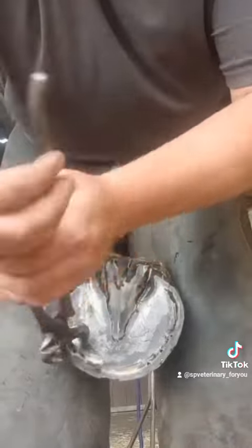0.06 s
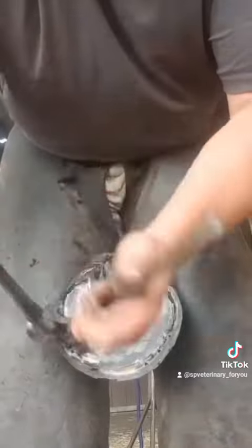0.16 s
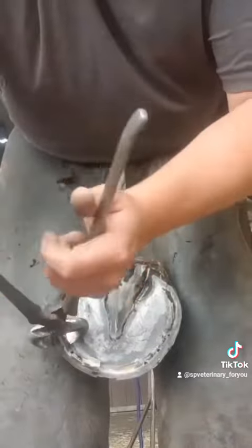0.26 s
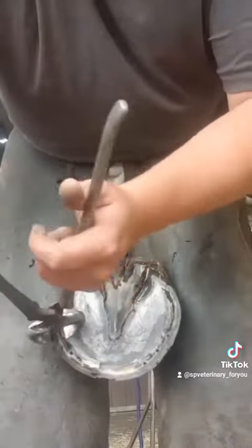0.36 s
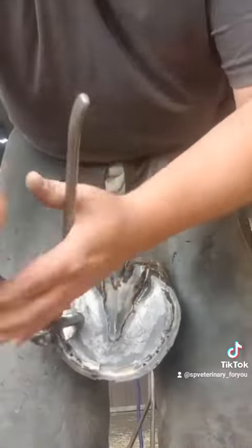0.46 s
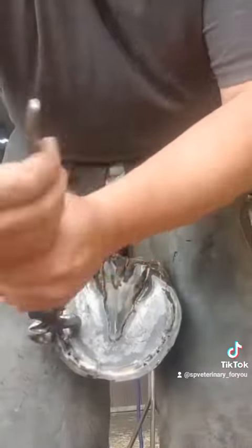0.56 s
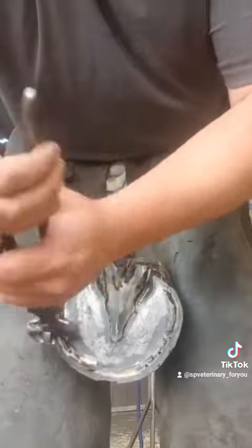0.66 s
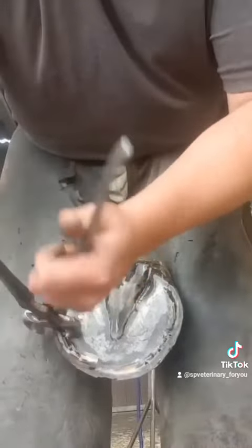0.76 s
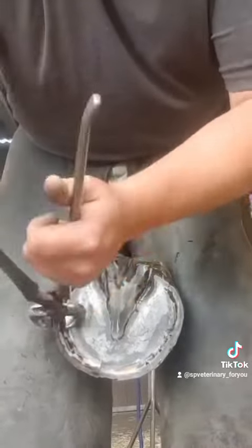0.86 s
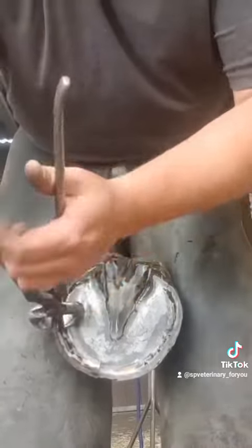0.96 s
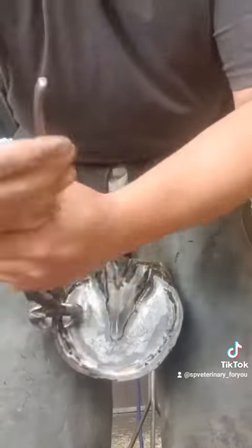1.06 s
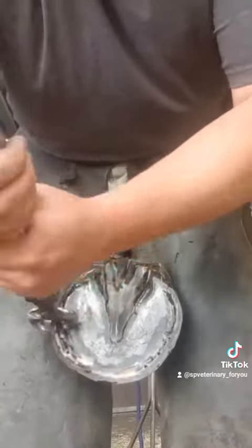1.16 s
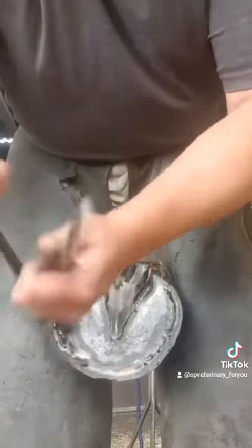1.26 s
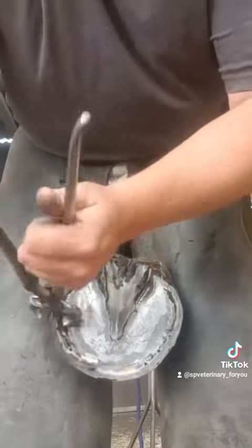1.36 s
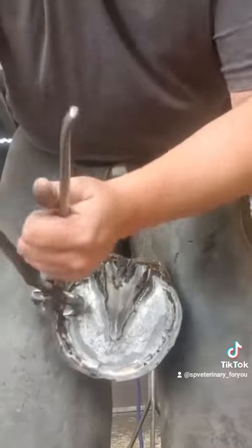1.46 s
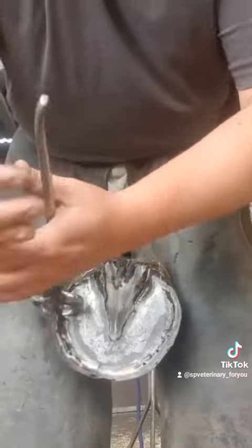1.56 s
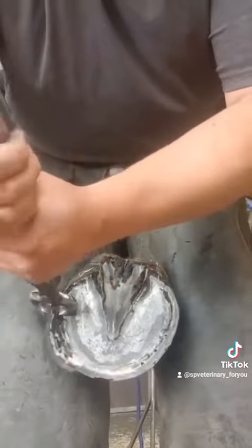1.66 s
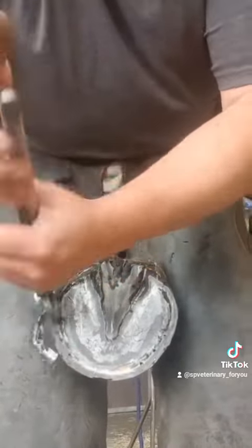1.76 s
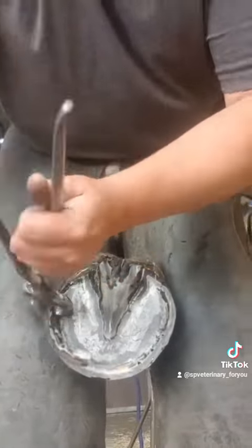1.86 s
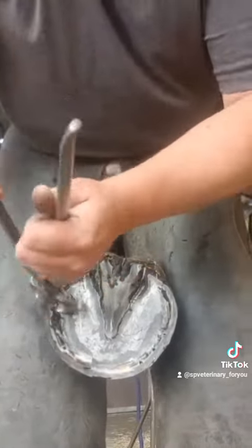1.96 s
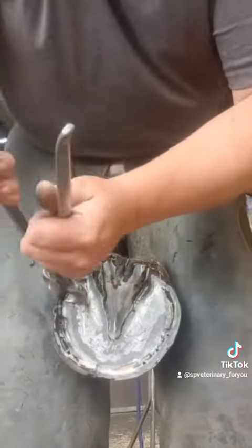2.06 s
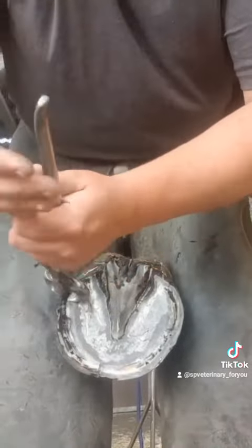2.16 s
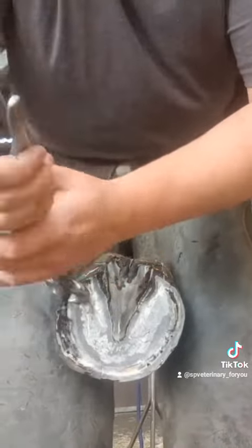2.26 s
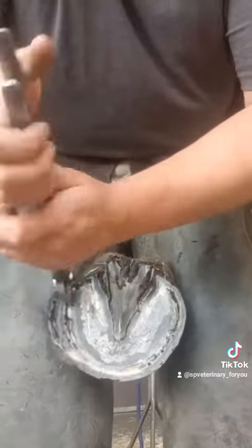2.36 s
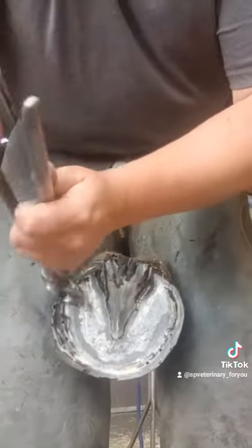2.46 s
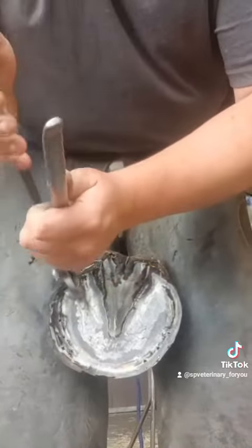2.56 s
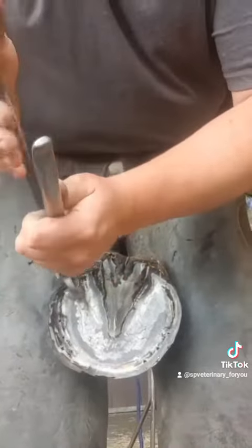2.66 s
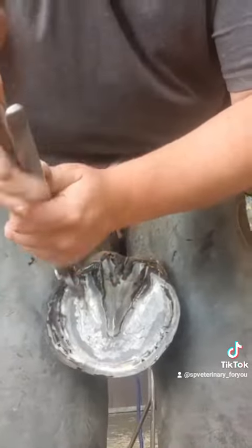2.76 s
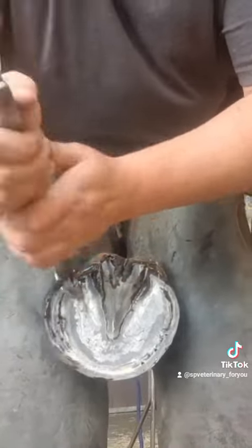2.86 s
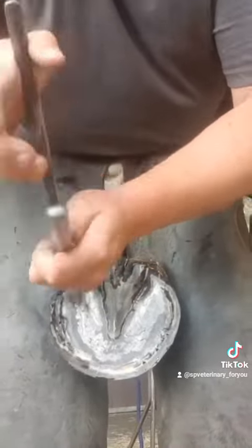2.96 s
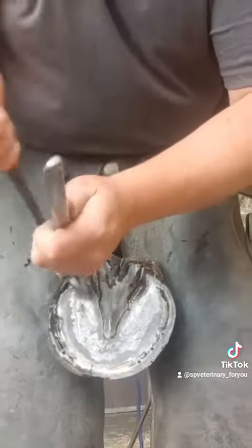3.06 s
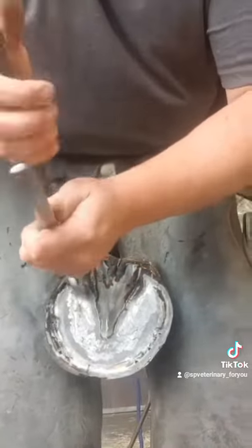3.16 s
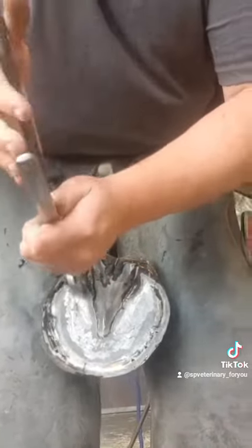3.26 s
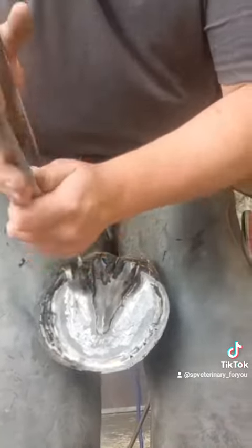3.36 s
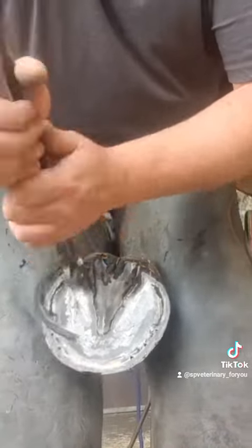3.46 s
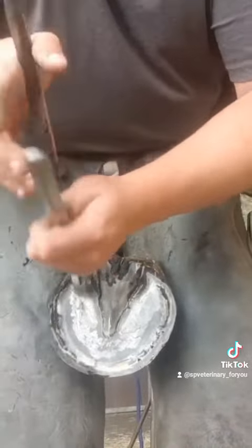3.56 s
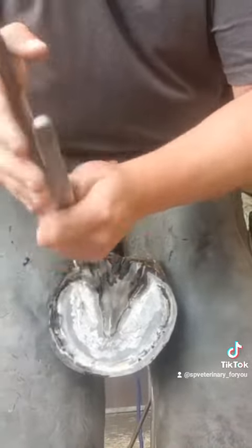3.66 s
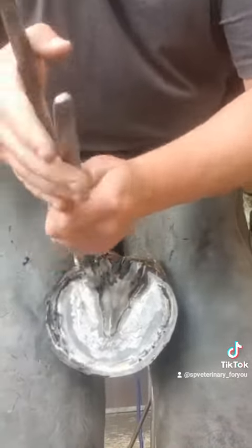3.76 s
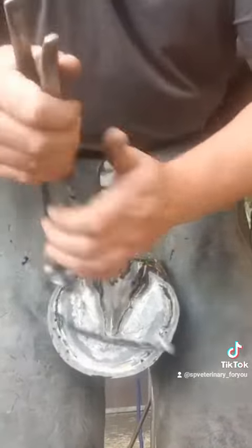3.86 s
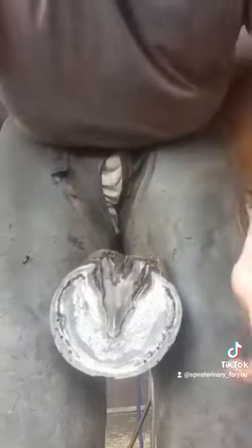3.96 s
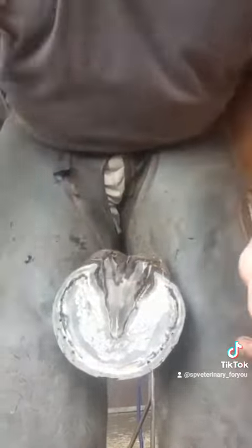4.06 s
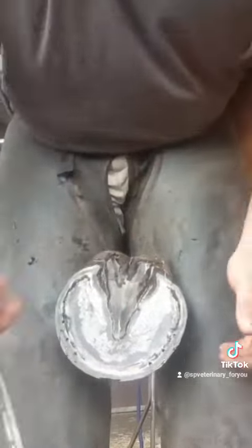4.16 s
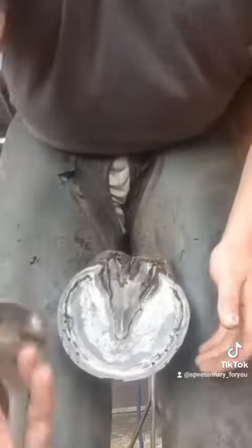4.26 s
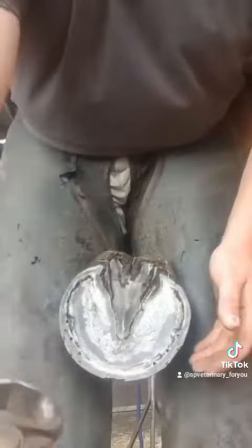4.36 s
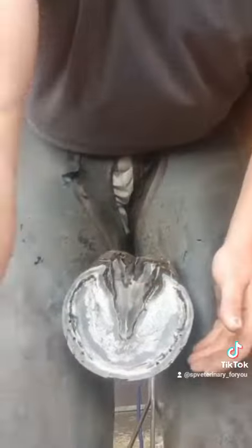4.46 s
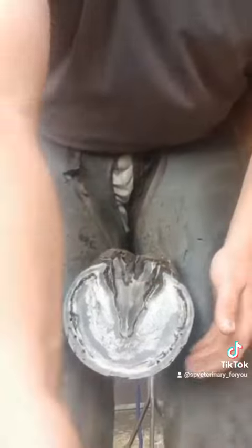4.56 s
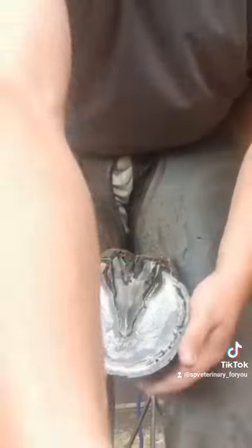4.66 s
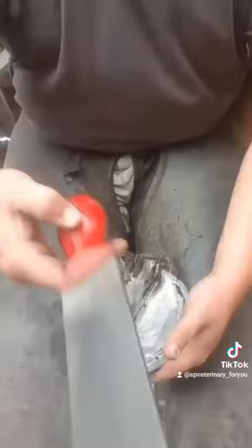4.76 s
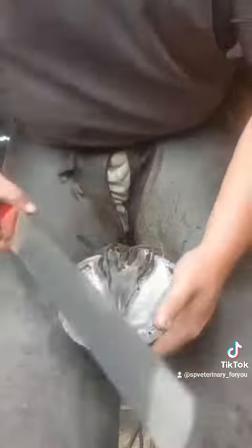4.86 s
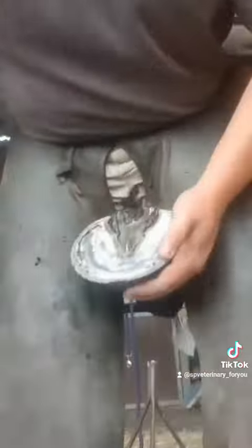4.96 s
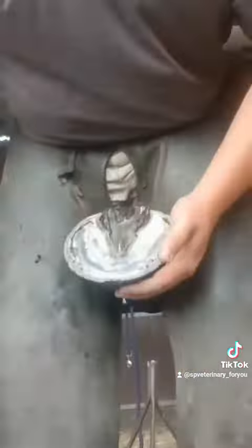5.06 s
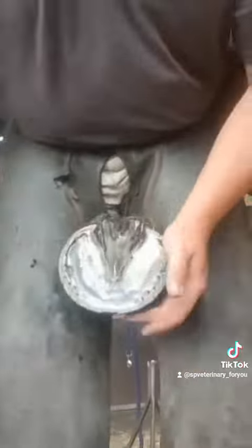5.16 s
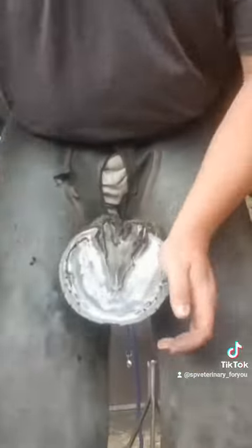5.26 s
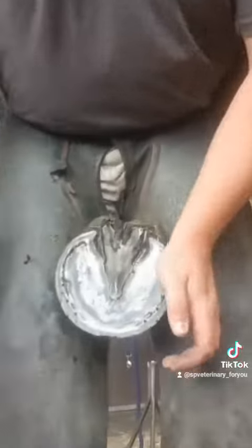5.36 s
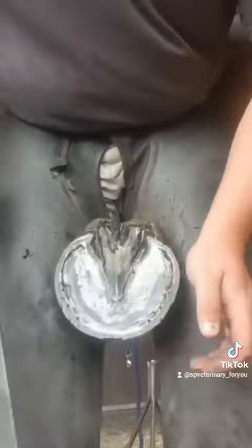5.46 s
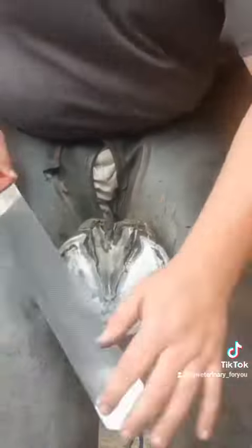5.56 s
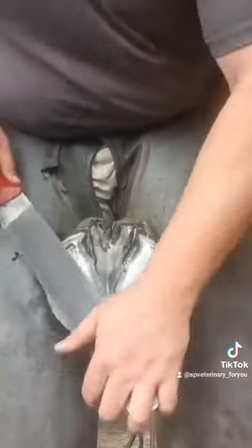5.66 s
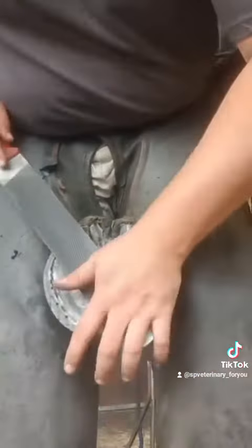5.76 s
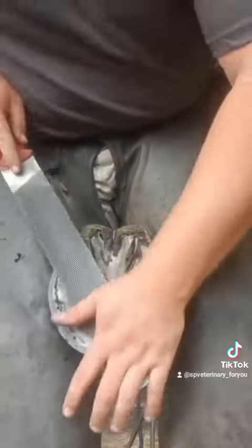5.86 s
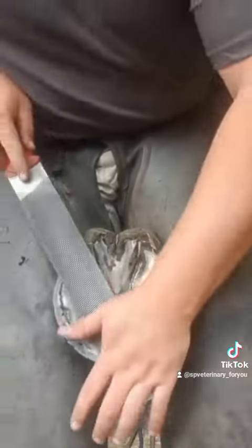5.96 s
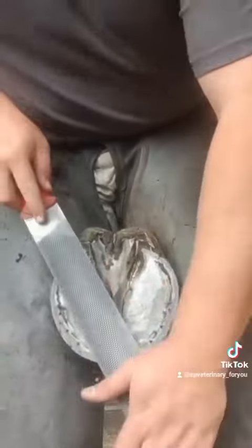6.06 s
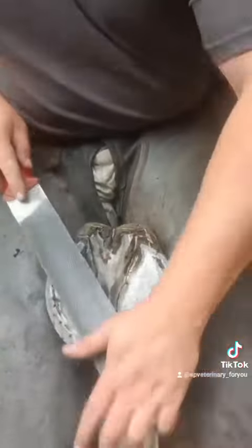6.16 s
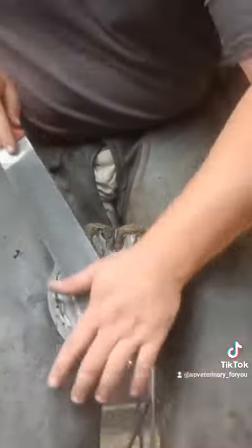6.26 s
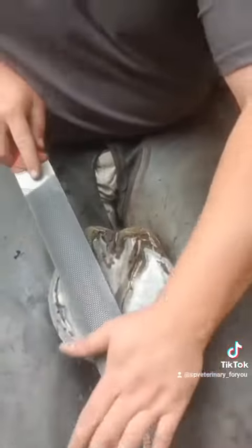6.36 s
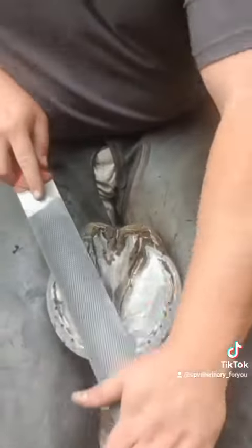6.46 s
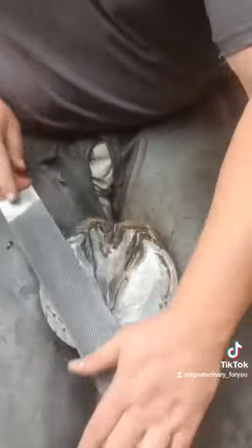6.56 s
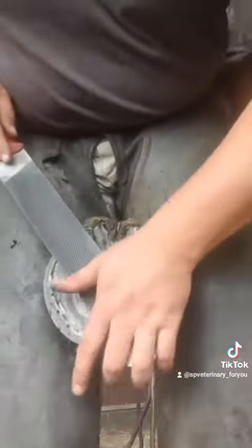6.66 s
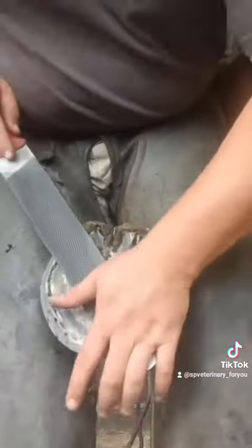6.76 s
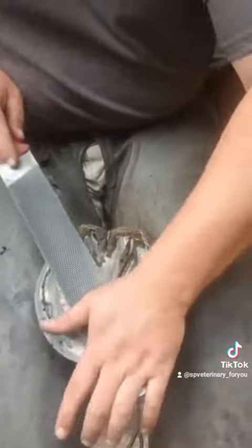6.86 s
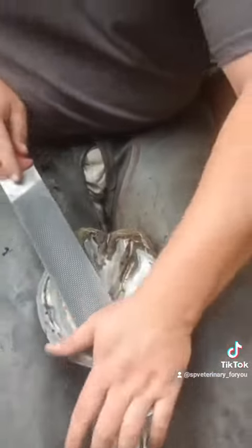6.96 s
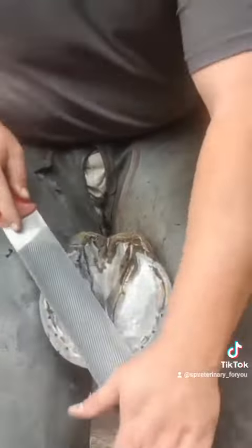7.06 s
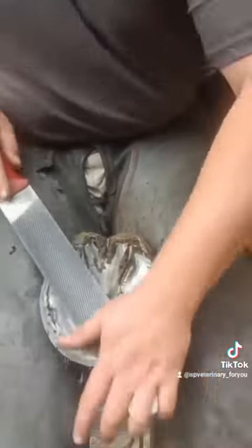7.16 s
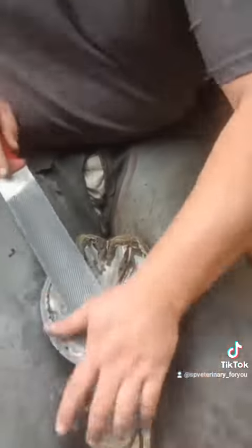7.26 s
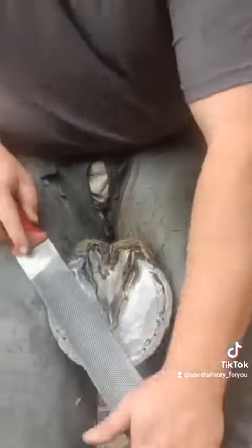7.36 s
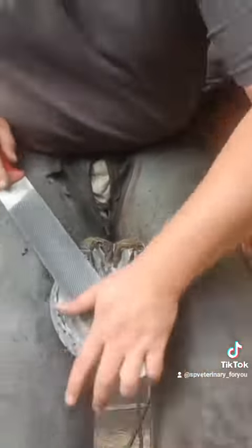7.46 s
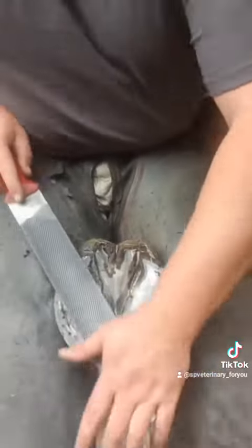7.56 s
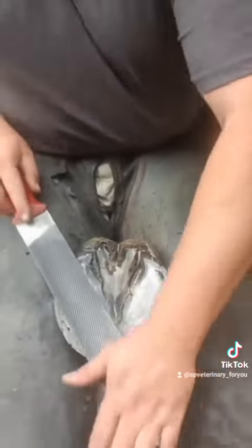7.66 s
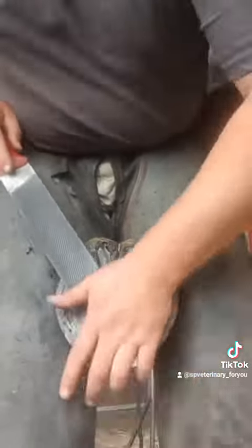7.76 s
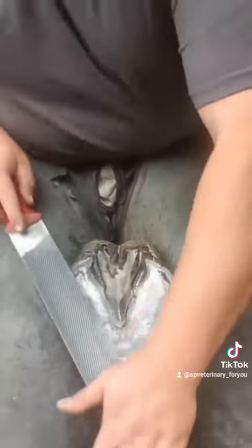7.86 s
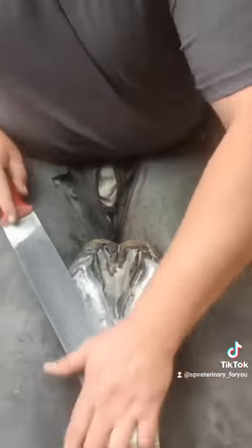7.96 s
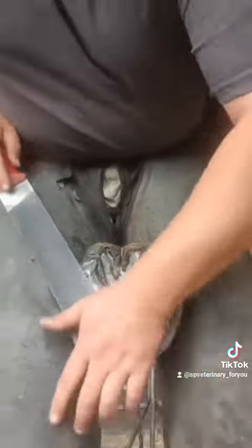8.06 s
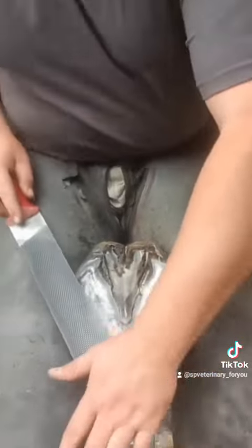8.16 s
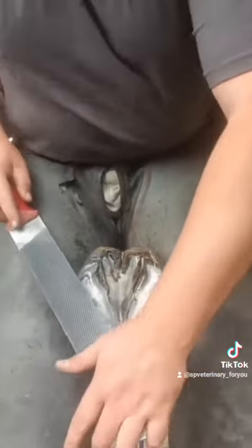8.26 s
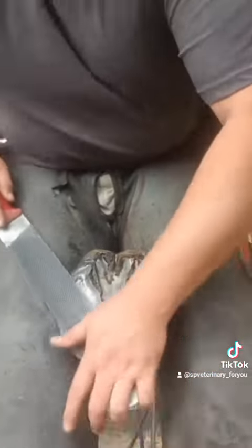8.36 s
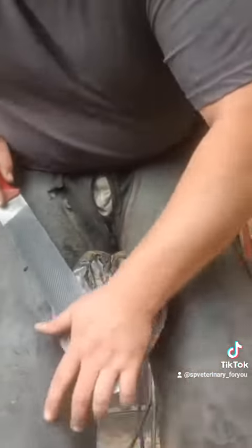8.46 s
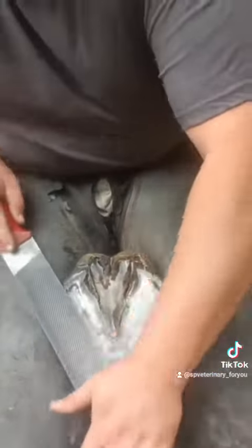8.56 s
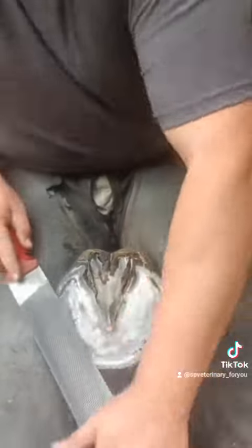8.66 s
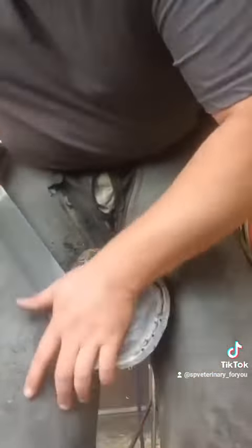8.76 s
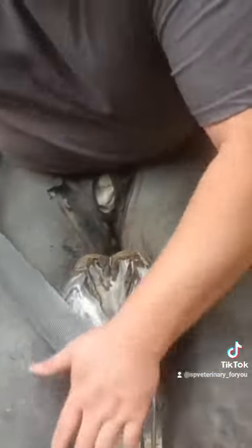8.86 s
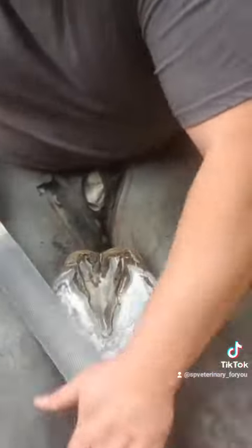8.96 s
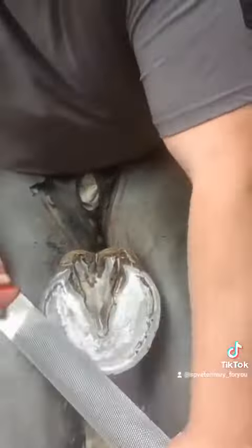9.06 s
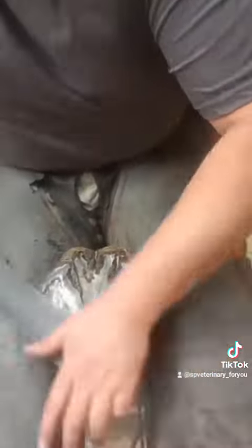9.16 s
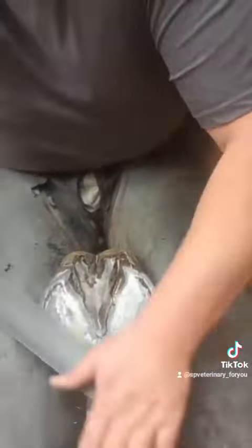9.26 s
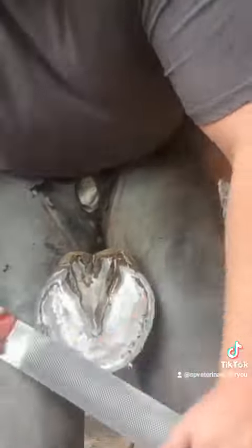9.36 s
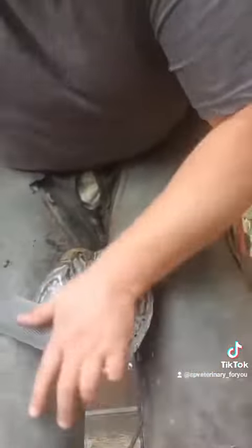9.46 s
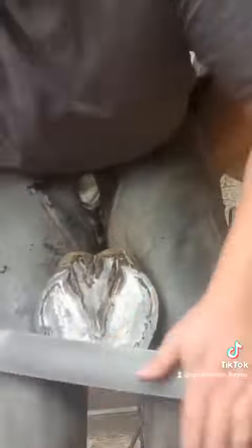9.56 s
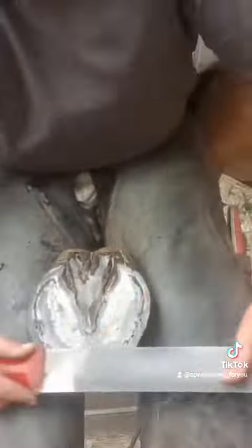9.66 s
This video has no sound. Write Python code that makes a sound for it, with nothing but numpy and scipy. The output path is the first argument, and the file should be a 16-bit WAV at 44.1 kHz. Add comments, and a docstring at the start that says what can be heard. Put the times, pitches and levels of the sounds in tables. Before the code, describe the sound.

Sharp, slightly ringing snips of hoof nippers give way to knocks and brief brushing, then a rasp scrapes rapidly back and forth.

```python
"""A farrier's nippers, brush and rasp work a hoof in a yard, close to a microphone with two spaced ports.
The horn cracks between the jaws, which rattle shut and ring the steel handles; hands and tools bump and tick.
A brush sweeps the sole from the right, then quick rasp strokes tear the horn: the blade sings, the hoof groans.
Sleeves and apron rustle, and the yard walls send back a short echo.
A low rumble swells with thumps of the cuts and handling carried to the microphone."""
import sys
import numpy as np
from scipy import signal
from scipy.fft import rfft, irfft
from scipy.io import wavfile
from scipy.ndimage import uniform_filter1d, map_coordinates

SR = 44100
rng = np.random.default_rng(int(sys.argv[2]) if len(sys.argv) > 2 else 0)


def put_to_file(sound):
    """Save the sound as 16-bit audio at rate SR, in the file named by the first command-line argument."""
    columns = np.atleast_2d(sound).T  # one column per channel
    safe = np.clip(columns, -1, 1)
    whole_steps = np.round(safe * 32767)
    wavfile.write(sys.argv[1], SR, whole_steps.astype(np.int16))


N = 427769

# Arm movements: start_s, length_s, rustle_db, hum_above_db, hiss_above_db
CLOTH_MOVES = [(0.086, 0.23, -67.5, -0.5, 0), (0.307, 0.14, -63.5, -2, -21), (0.65, 0.23, -61.5, 4, -7.5),
               (0.98, 0.041, -66.5, 2.5, -4), (1.14, 0.046, -76, 5.5, -19), (1.406, 0.14, -64, -18, -5),
               (1.867, 0.2, -64, -8, -3.5), (2.026, 0.048, -70, 0, 5), (2.386, 0.25, -67.5, -7, -3),
               (2.641, 0.12, -75.5, -0.5, -7), (2.869, 0.45, -78, 11.5, -7), (3.323, 0.16, -68, 3, -7),
               (3.744, 0.096, -67, 2.5, 8.5), (3.955, 0.09, -91, 20, 3.5), (4.114, 0.21, -65, 1, 6.5),
               (4.356, 0.38, -72.5, 6, 6), (5.06, 0.031, -87, 13.5, -14), (5.176, 0.051, -61.5, -7, 1.5),
               (5.411, 0.029, -82.5, -0.5, 12), (5.545, 0.18, -68, -7.5, -3.5), (5.906, 0.088, -87, 20, 5),
               (6.035, 0.11, -77.5, 9, -3)]
# The cloth's middle, low and high layers: freq_hz, level_db
RUSTLE_SPECTRUM = [(850, -24), (1100, -1.5), (1900, -3), (2900, -6), (3450, -22)]
HUM_SPECTRUM = [(76, -42), (130, -16), (291, -11.5), (332, -0.5), (370, -6), (458, -4), (501, -5),
                (1100, -23), (1430, -53.5), (2420, -120)]
HISS_SPECTRUM = [(2600, -19), (3100, -7.5), (5000, -2.5), (6200, -15), (8500, -19.5), (12000, -28.5),
                 (15000, -38.5)]
# Narrow bands in rustle and hiss: centre_hz, width_hz, gain_db
CLOTH_PEAKS = [(1450, 360, 7.5), (2220, 480, 13), (4000, 250, 5.5), (4590, 450, 8)]
# Low rumble, swelling with thumps of the cuts and handling carried to the microphone: time_s, level_db
RUMBLE_LEVEL = [(0.0, -65), (0.24, -56), (0.51, -73.5), (0.86, -55), (0.94, -76), (1.2, -60.5),
                (1.7, -71.5), (1.95, -56), (2.08, -69), (2.16, -54.5), (2.3, -54.5), (2.75, -60.5),
                (3.2, -54), (3.6, -59), (3.95, -66.5), (4.25, -58), (4.54, -61), (4.83, -46), (5.08, -71),
                (6.05, -64.5), (6.24, -49), (6.83, -54.5), (6.89, -36), (7.0, -64.5), (7.24, -53.5),
                (8.21, -57.5), (9.05, -46), (9.13, -36.5), (9.25, -43.5), (9.55, -50), (9.62, -48),
                (9.7, -44)]
# Colour of the rumble: freq_hz, level_db
RUMBLE_SPECTRUM = [(12, -40), (20, -21), (54, 8.5), (123, -1), (170, -4), (220, -23.5), (370, -120)]
# Nipper cuts: start_s, level_db, rise_s, hold_s, t60_s, shut_after_s, rattle_above_db, steel_ring_db,
# then band gains against the ring band: jolt_db, thud_db, knock_db, crack_db, clang_db, treble_db
NIPPER_CUTS = [(0.23, -4.5, 0.00058, 0.0036, 0.024, 0.014, -4, -54.5, -18, -14.5, -14, -6, -5.5, -21),
               (0.8463, -7, 0.00066, 0.0021, 0.028, 0.013, -6.5, -53, -14.5, -18, -14, 1.5, -1, -14),
               (1.3756, -9, 0.00065, 0.0024, 0.011, 0.019, -26.5, -53.5, -20, -12.5, -8, 5.5, -1, -19.5),
               (1.934, -10, 0.00082, 0.0014, 0.034, 0.012, -3, -57, -12, -16, -10, 1, -1, -10),
               (2.5463, -23.5, 0.0009, 0.01, 0.012, 0.0094, 10, -75, -17, -18, -3, 6, 3, -6),
               (3.098, -28, 0.0044, 0.0058, 0.028, 0.017, -13, -67, -5, -14.5, 0, 5.5, 7, -10.5),
               (3.707, -15.5, 0.006, 0.0016, 0.022, 0.0084, -24, -81, -20, -30.5, -7.5, 2.5, 5, -15.5)]
# Lingering rings of the steel handles: pitch_hz, level_db, t60_s
HANDLE_MODES = [(2200, -7, .17), (2270, -4, .26), (2338, -2, .33), (2365, -4, .28), (2420, -6, .2),
                (3540, -11, .16), (3725, -9, .24), (4290, -10, .2), (4530, -13, .24), (5050, -12, .16),
                (5290, -14, .12), (5580, -15, .16)]
# Colour common to all snaps: freq_hz, level_db
SNAP_SPECTRUM = [(60, -7), (150, -3), (280, 3), (420, 17), (800, 7.5), (1000, -3), (1800, -5), (2900, -8.5),
                 (5600, -0.5), (6500, -11), (8300, -11.5), (9200, -17.5), (11000, -7.5), (14000, -24.5),
                 (15000, -28)]
# Treble lift on the second burst of each snap, a bright hiss after the crack: freq_hz, gain_db
SECOND_BURST_LIFT = [(1000, -8), (3700, -7.5), (5200, -2), (7800, 8), (12000, 3)]
# Short rings of the jaws: centre_hz, width_hz, gain_db
JAW_PEAKS = [(1305, 260, 21), (2278, 300, 18.5), (3684, 440, 14.5), (4300, 180, 6.5), (4810, 310, 10),
             (5286, 330, 8), (7800, 430, 9.5)]
# Bumps of hands, tools and hoof: start_s, peak_db, pitch_hz, t60_s, length_s, scuff_db
BUMPS = [(0.435, -55, 652, 0.03, 0.045, -62), (1.093, -49, 340, 0.1, 0.015, -72.5),
         (1.168, -56.5, 373, 0.044, 0.023, -75), (2.153, -29.5, 102.5, 0.0078, 0.026, -56),
         (2.291, -19.5, 289, 0.017, 0.013, -37), (2.292, -20, 707, .015, 0.0062, -60),
         (2.431, -47, 124, 0.067, 0.017, -81), (2.733, -52, 103, 0.045, 0.01, -59),
         (3.221, -49, 102, 0.065, 0.0049, -50), (3.269, -32.5, 760, 0.018, 0.04, -53),
         (3.29, -33.5, 386, 0.018, 0.042, -76), (3.49, -24, 300, 0.014, 0.018, -65),
         (3.497, -29.5, 740, .015, 0.02, -38.5), (3.609, -31.5, 280, 0.014, 0.018, -52.5),
         (4.069, -43, 466, 0.076, 0.01, -47.5), (4.243, -41, 456, 0.053, 0.012, -39.5),
         (4.33, -34.5, 367, 0.02, 0.021, -62), (4.573, -23, 830, 0.024, 0.017, -49),
         (4.6588, -12, 764, 0.042, 0.003, -23.5), (4.663, -33, 326, 0.025, .005, -57.5),
         (4.688, -20, 790, .025, .01, -45), (4.96, -27.5, 205, 0.035, 0.02, -60),
         (4.719, -27, 770, 0.047, 0.008, -52), (4.801, -4, 774, 0.025, 0.012, -23.5),
         (4.823, -14, 864, 0.026, 0.0033, -16), (5.034, -28, 786, 0.013, 0.014, -59),
         (5.88, -49, 604, 0.04, 0.0087, -59), (5.996, -40.5, 203, 0.045, 0.015, -58.5),
         (6.068, -58, 104.4, 0.049, 0.016, -53), (6.126, -39, 535, 0.014, 0.019, -50),
         (6.204, -29.5, 456, 0.017, 0.0064, -43), (6.559, -21.5, 450, 0.0091, 0.0052, -43),
         (6.672, -29.5, 231, 0.017, 0.011, -52), (6.695, -28, 450, 0.011, .008, -47),
         (6.775, -30, 220, .02, 0.019, -60), (6.778, -26.5, 810, .015, 0.021, -56),
         (6.833, -30, 754, 0.019, .015, -58), (6.854, -15.5, 170, 0.058, 0.006, -54),
         (6.878, -11.5, 260, 0.037, 0.015, -54), (7.083, -36.5, 600, 0.033, 0.012, -40),
         (8.502, -25.5, 500, 0.0094, 0.0077, -43)]
# Surfaces scuffing: freq_hz, level_db
SCUFF_SPECTRUM = [(300, -33.5), (550, -2.5), (1800, -4.5), (2900, -12.5), (5000, 2), (6200, -13.5),
                  (8500, -21), (12000, -43), (15000, -49.5)]
# Faint high chirps: start_s, peak_db, pitch_hz, length_s
CHIRPS = [(0.452, -44.5, 4630, 0.036), (.728, -41, 2270, 0.022), (0.97, -56, 4340, 0.037),
          (1.158, -54.5, 1640, 0.032), (1.5, -58, 1570, 0.075), (1.543, -54.5, 4510, 0.063),
          (3.36, -53, 4450, 0.13), (3.801, -52, 4880, 0.015), (4.162, -50, 4400, 0.047),
          (4.362, -50.5, 4510, 0.055)]
# Dry pivot of the nippers: time_s, level_db
SQUEAK_LEVEL = [(1.45, -85), (1.46, -30), (1.482, -37), (1.52, -93)]
# Soft swells of treble: start_s, level_db, length_s
SWISHES = [(2.051, -73.5, .04), (4.248, -68, 0.031), (4.791, -53, 0.021), (9.591, -59.5, 0.044)]
# Tool ticking on tool or horn: start_s, peak_db
TICKS = [(3.492, -46.5), (4.2458, -27), (4.568, -42.5), (4.658, -15), (4.7205, -34.5), (4.825, -12),
         (4.9358, -23.5), (6.56, -29.5), (6.673, -36), (6.732, -26), (6.865, -20), (7.0938, -29.5),
         (8.502, -36), (9.1904, -34)]
# Strokes on the hoof: start_s, length_s, peak_place (0-1), slope_db_per_s (to and from the peak),
# level_db, hoof_above_db, teeth_above_db
BRUSH_STROKES = [(4.556, 0.041, 0.67, 567.5, -32, 1.5, -10), (4.61, 0.041, 0.4, 888, -39.5, 7, -2.5),
                 (4.678, 0.02, 0.54, 495.5, -40.5, 9, -2.5), (4.716, 0.1, 0.8, 31, -40, 3.5, 1),
                 (4.799, 0.024, 1, 85.5, -30, 5.5, 2), (4.84, 0.045, 0.66, 325.5, -52, 13.5, -16.5),
                 (4.922, 0.064, 0.54, 388.5, -29, -2, 4.5)]
RASP_STROKES = [(6.245, 0.086, 0.72, 149, -38.5, 0, 1), (6.342, 0.024, .5, 100, -43, -1.5, -1.5),
                (6.41, 0.081, 0.62, 403, -35.5, 4.5, 0), (6.548, 0.048, 0.96, 144, -40.5, 3, 1.5),
                (6.615, 0.018, 0.74, 510, -43, 1.5, 0), (6.668, 0.026, 0.97, 499, -41, 10, 1),
                (6.722, 0.062, 0.57, 230, -40.5, 2.5, 0), (6.83, 0.13, 0.35, 560, -30, 6, -4),
                (7.188, 0.17, 0.84, 61, -44, 1.5, 0.5), (7.395, 0.08, 0.47, 233, -41.5, 3.5, 1.5),
                (7.513, 0.12, 0.61, 117, -39, 1, 0.5), (7.675, 0.071, 0.61, 287, -42, 4.5, 2),
                (7.785, 0.11, 0.48, 161, -42, 2, 1.5), (7.935, 0.066, 0.52, 347, -42, 3, 1),
                (8.035, 0.15, 0.56, 132, -40.5, 1, 4.5), (8.215, 0.067, 0.56, 251, -42, 1.5, 3.5),
                (8.315, 0.12, 0.7, 142, -39, -3, 0.5), (8.47, 0.023, 0.7, 103, -52, -3, -1),
                (8.498, 0.052, 0.21, 723, -32, -1.5, -6.5), (8.625, 0.059, 0.42, 292, -53.5, 6, 2.5),
                (8.725, 0.17, 0.55, 120, -41.5, 0, 5), (8.935, 0.077, 0.62, 345, -36, 2, 4.5),
                (9.035, 0.13, 0, 93, -48, 1.5, 3), (9.19, 0.15, 0.46, 171.5, -37, 1, 4.5),
                (9.39, 0.084, 0.42, 295, -37, -1.5, 4.5), (9.49, 0.13, 0.38, 98, -37, -3, 2.5),
                (9.62, 0.028, 0.46, 513, -36.5, -0.5, 2.5), (9.665, 0.058, 0.6, 427, -35, -5, 6)]
# What a scrape sounds in (hoof under either tool, blade, teeth): freq_hz, level_db
BRUSHED_HOOF_SPECTRUM = [(65, -112), (110, -40.5), (151, 2), (189, -1.5), (367, -5), (509, -5), (693, 7),
                         (980, -9), (1100, 0), (1430, -57.5), (2420, -120)]
RASPED_HOOF_SPECTRUM = [(65, -24), (110, -2.5), (216, -1), (257, -1), (378, -1), (420, -0.5), (490, 0.5),
                        (734, -5), (1100, -14.5), (1430, -30), (2420, -120)]
BLADE_SPECTRUM = [(850, -16), (1050, 4), (1900, -1), (2900, -3), (3300, -22)]
TEETH_SPECTRUM = [(2700, -55), (3100, -13), (5000, 0), (6000, -11.5), (8300, -18.5), (9500, -32.5),
                  (12000, -34.5), (15000, -57)]
# Hollow rings of the hoof: centre_hz, width_hz, gain_db
HOOF_PEAKS = [(294, 52, 4.5), (418, 21, 3), (633, 70, 6)]
# Narrow rings of the rasp blade: pitch_hz, level_db, t60_s
BLADE_MODES = [(1193, -53, 0.037), (1505, -45.5, 0.069), (1738, -50, 0.065), (2106, -55, 0.088),
               (2357, -46, 0.077), (2503, -42, 0.052), (2930, -37, .03), (3384, -30, 0.025),
               (3696, -32.5, 0.022), (4380, -40, 0.034), (4716, -34.5, 0.024), (5067, -38, 0.041),
               (5520, -44, 0.041)]
# The blade rings less as the free hand bears down on it: time_s, gain_db
BLADE_RING_LEVEL = [(4, -5.5), (7.9, -6.5), (8.1, -4.5), (9.7, -7.5)]
# The blade singing and the hoof groaning: start_s, peak_db, pitch_hz, length_s
BLADE_SINGS = [(6.305, -24.5, 2344, 0.021), (6.35, -32, 2440, 0.029), (6.44, -33, 2500, 0.017),
               (6.67, -32, 2320, 0.018), (6.725, -30.5, 2290, 0.024), (6.75, -31.5, 3340, .015),
               (6.865, -18.5, 4340, 0.012), (7.56, -34, 2450, 0.066), (7.71, -36, 1530, 0.034),
               (7.835, -34.5, 2380, .04), (7.95, -38.5, 1430, 0.039), (8.03, -38, 1736, 0.044),
               (8.105, -33, 3850, .05), (8.235, -36, 1480, 0.046), (8.37, -34, 3950, 0.039)]
HOOF_GROANS = [(6.443, -25.5, 152, 0.031), (6.885, -23, 425, 0.029), (7.416, -35.5, 336, 0.048),
               (7.559, -26.5, 163, 0.04), (7.702, -34.5, 452.4, 0.041), (7.944, -38, 190, 0.028),
               (7.98, -33, 312, 0.034), (8.244, -29, 334, 0.021), (8.272, -31, 336, 0.0195),
               (8.394, -41, 240, 0.021), (8.827, -37, 585, 0.086), (8.965, -33.5, 180, 0.04),
               (9.229, -35, 583, 0.042), (9.409, -34.5, 630, 0.044), (9.535, -36, 526, 0.03),
               (9.59, -30.5, 241, .03)]
# What the yard walls send back: freq_hz, gain_db
WALL_SPECTRUM = [(200, -5), (600, -1), (1300, -4), (2300, 0.5), (3750, -3.5), (5000, -2.5), (10000, -0.5)]
# Resonances of the microphone housing: centre_hz, width_hz, gain_db
HOUSING_PEAKS = [(1506, 460, 8), (2352, 710, 12), (3753, 810, 5), (4500, 6200, 4)]
# Balance of the two ports: freq_hz, left_minus_right_db
PORT_BALANCE = [(60, -9), (110, -11.5), (200, -1.5), (380, 1.5), (700, -3.5), (1280, -2.5), (2370, -1.5),
                (4370, 0), (8070, 3.5), (14900, 8.5)]

SNAP_BANDS_HZ = 170, 550, 1310, 2320, 3700, 5000, 10000   # jolt, thud, knock, ring, crack, clang, treble
BITE_DB_PER_S, LIFT_DB_PER_S = 2501, 1303   # how fast a tool takes hold and lets go


def amp(db):
    """Decibels to gain."""
    return 10 ** (np.asarray(db, float) / 20)


def rms_one(x):
    """Scale to an rms of 1."""
    return x / np.sqrt(np.mean(x ** 2) + 1e-20)


def level_curve(rows):
    """Level in dB at every sample; silent outside the rows."""
    time_s, db = np.transpose(rows)
    return np.interp(np.arange(N) / SR, time_s, db, left=-150, right=-150)


def colour(x, spectrum, peaks=()):
    """Minimum-phase filter from a spectrum and resonant peaks."""
    hz, points = np.linspace(1, SR / 2, 4097), np.array(spectrum)
    db = np.interp(np.log(hz), np.log(np.maximum(points[:, 0], 1)), points[:, 1])
    db += sum(gain / (1 + (2 * (hz - centre) / width) ** 2) for centre, width, gain in peaks)
    cepstrum = irfft(db * np.log(10) / 20)
    cepstrum[1:4096] *= 2
    cepstrum[4097:] = 0
    response = irfft(np.exp(rfft(cepstrum)))[:4096]
    return signal.oaconvolve(x, response)[:N]


def band(x, spectrum, peaks=()):
    """Colour x, with -80 dB an octave beyond both ends of the spectrum; rms 1."""
    closed = [(spectrum[0][0] / 2, -80), *spectrum, (spectrum[-1][0] * 2, -80)]
    return rms_one(colour(x, closed, peaks)[:len(x)])


def drift(rate_hz):
    """Slow random wander of rms 1."""
    pole = np.exp(-80 * np.pi * rate_hz / SR)
    slow = signal.lfilter([1], [1, -2 * pole, pole * pole], rng.standard_normal(N // 40 + 2002))[2000:]
    return np.interp(np.arange(N) / 40, np.arange(len(slow)), rms_one(slow))


def ring(x, hz, t60):
    """Resonator: a unit click sets a sine of height 1 ringing."""
    pole, angle = amp(-60 / (t60 * SR)), 2 * np.pi * hz / SR
    return signal.lfilter([0, np.sin(angle)], [1, -2 * pole * np.cos(angle), pole * pole], x + 1e-18)


def grains(per_s, spread_db, count=N):
    """Random clicks of uneven size; rms 1."""
    sizes = amp(spread_db * np.minimum(rng.exponential(1, count), 5)) * rng.choice([-1, 1], count)
    return rms_one(sizes * (rng.random(count) < per_s / SR))


def pulse(start, rise, t60, hold=0):
    """Samples and gains of an envelope that swells to 1, holds and dies."""
    t = np.arange(-4 * rise, hold + t60, 1 / SR)
    at = np.round((start + rise + t) * SR).astype(int)
    shape = np.where(t < 0, np.exp(t / rise), amp(-60 * np.maximum(t - hold, 0) / t60))
    return at[at < N], shape[at < N]


def stroke(start, length, place, slope, bite, lift):
    """Samples and gains of a movement that takes hold, swells to 1, sags and lets go; rates in dB/s."""
    at = np.arange(max(int((start - .3) * SR), 0), min(int((start + length + .3) * SR), N))
    t = at / SR - start
    edges_db = bite * np.maximum(-t, 0) + lift * np.maximum(t - length, 0)
    return at, amp(-slope * np.abs(t - place * length) - edges_db)


def two_paths(x, radians):
    """Sound wraps round the body to each port by its own path: band by band one port leads or lags."""
    hz = np.arange(0, SR / 2 + 700, 700)
    chance = np.interp(np.fft.rfftfreq(len(x), 1 / SR), hz, rng.standard_normal(len(hz)))
    lead = radians * np.tanh(3.9 * chance)
    return irfft(rfft(x) * np.exp(1j * lead * [[1], [-1]]), len(x))


def moving(pair, wander_s, rate_hz):
    """The far port hears a moving source a little earlier or later."""
    read_at = np.arange(N) + wander_s * SR * drift(rate_hz)
    return np.array([pair[0], map_coordinates(pair[1], [read_at], order=3, mode="nearest")])


def cloth(fade_db_per_s=251.5):
    """Sleeves and apron rub as the arms move: patchy rustle, hum and hiss."""
    levels = amp([[-79], [-70], [-70.5]]) * np.ones(N)   # the three layers when nothing moves
    for start, length, db, hum_db, hiss_db in CLOTH_MOVES:
        at, shape = stroke(start, length, .5, 0, fade_db_per_s, fade_db_per_s)
        levels[:, at] += amp([[db], [db + hum_db], [db + hiss_db]]) * shape
    rustle, hum, hiss = levels * amp([2.6 * drift(5.5) + 1.6 * drift(25) for layer in range(3)])
    out, shared = np.zeros((2, N)), grains(5000, 1.9)
    for port, shift in zip(out, (9, -9)):
        rubbing = np.roll(shared, shift) + 6.9 * rng.standard_normal(N)
        port += rustle * band(rubbing, RUSTLE_SPECTRUM, CLOTH_PEAKS)
        port += hiss * band(rubbing, HISS_SPECTRUM, CLOTH_PEAKS)
        port += hum * band(rubbing, HUM_SPECTRUM)
    return out


def rumble():
    """Low rumble, each port's own, swelling with thumps of cuts and handling carried to the microphone."""
    swell = amp([level_curve(RUMBLE_LEVEL) + 1.5 * drift(6.8) for port in range(2)])
    return swell * [band(rng.standard_normal(N), RUMBLE_SPECTRUM) for port in range(2)]


def burst(noise, start, db, rise, t60, hold=0):
    """A pulse of noise with the energy of its envelope, scaled by db."""
    out = np.zeros(len(noise))
    at, shape = pulse(start, rise, t60, hold)
    shaped = shape * noise[at]
    out[at] = amp(db) * shaped * np.linalg.norm(shape) / np.linalg.norm(shaped)
    return out


def evened(x):
    """A burst with its chance peaks and holes filtered flat, at the same energy."""
    hz = np.arange(150, 16000, 150)
    power = uniform_filter1d(np.abs(rfft(x)) ** 2, size=100)[hz * len(x) // SR]
    flat = colour(x, np.column_stack([hz, -10 * np.log10(power)]))[:len(x)]
    return flat * np.linalg.norm(x) / np.linalg.norm(flat)


def nippers(lead_s=.02):
    """The horn cracks, then the jaws rattle shut; both ring the steel, which wavers in the grip."""
    out, size = np.zeros((2, N)), SR // 3
    for start, db, rise, hold, t60, shut, rattle_db, ring_db, *bands_db in NIPPER_CUTS:
        noise = grains(16000, 0.49, size)
        crack = burst(noise, lead_s, db, rise, t60, hold)
        crack[round((lead_s + rise) * SR)] += amp(db + 1.5)   # the horn gives way with one click
        rattle = burst(noise, lead_s + .0005 + shut, db + rattle_db, rise=.003, t60=.055)
        force = evened(crack) + colour(evened(rattle), SECOND_BURST_LIFT)[:size]
        cut_spectrum = list(zip(SNAP_BANDS_HZ, bands_db[:3] + [0] + bands_db[3:]))
        blow = colour(force, cut_spectrum)[:size]
        snap = colour(blow, SNAP_SPECTRUM, JAW_PEAKS)[:size]
        steel = sum(amp(level + rng.normal(0, 3.3)) * ring(force, hz * rng.normal(1, 0.003), decay)
                    for hz, level, decay in HANDLE_MODES)
        grip = amp(ring_db + 3.0 * drift(45)[:size])
        first = round((start - lead_s) * SR)
        out[:, first:first + size] += two_paths(grip * steel + snap, radians=0.88)
    return out


def bumps():
    """A short push rings a dull body; the surfaces scuff just after."""
    out, scuff, push = np.zeros(N), np.zeros(N), rng.standard_normal(N)
    small_body = signal.butter(2, [140, 3500], "band", fs=SR)   # radiates no deep bass and no treble
    for start, db, hz, t60, length, scuff_db in BUMPS:
        at, shape = pulse(start, 0.00036 + 0.12 * length, length * 2.8)
        hit = np.pad(push[at] * shape, (0, SR // 8))
        side_modes = ring(hit, hz * rng.uniform(0.77, 2.8), t60 * 0.36) + ring(hit, hz * 0.5, t60)
        body = signal.lfilter(*small_body, ring(hit, hz, t60) + 0.22 * side_modes)
        out[at[0]:at[0] + len(body)] += amp(db) * body / np.abs(body).max()
        at, shape = pulse(start + length * 0.12, length * 0.74, length * 6)
        scuff[at] += amp(scuff_db) * shape
    return out + scuff * band(grains(5000, 1.4), SCUFF_SPECTRUM, HOUSING_PEAKS)


def brief_tones(events, t60):
    """Chirps, sings or groans: noise twice through a narrow resonance, swelling and fading."""
    out, white = np.zeros(N), rng.standard_normal(N)
    for start, db, hz, length in events:
        at, shape = pulse(start, length / 3, length * 3)
        tone = shape * ring(ring(white[at], hz, t60), hz, t60)
        out[at] += amp(db) * tone / np.abs(tone).max()
    return out


def pivot_squeak():
    """The nippers' dry pivot gives a thin, uneven hiss near 15 kHz."""
    hiss = band(grains(4000, 8.1), [(13200, -26), (14000, -26), (14900, 0), (15300, -23)])
    return amp(level_curve(SQUEAK_LEVEL)) * hiss


def swishes():
    """Airy hiss above 9 kHz that swells and fades."""
    level = np.zeros(N)
    for start, db, length in SWISHES:
        at, shape = pulse(start, length / 2, length * 4, hold=length / 2)
        level[at] += amp(db) * shape
    return level * band(grains(6000, 2.0), [(9000, -11.5), (10500, 0.5), (13500, -3.5), (15000, -14.5)])


def ticks():
    """Tool meets tool or horn in short dry cracks with the colour of the scuffs."""
    out, noise = np.zeros(N), band(rng.standard_normal(N), SCUFF_SPECTRUM, HOUSING_PEAKS)
    for start, db in TICKS:
        at, shape = pulse(start, rise=0.00032, t60=0.0048)
        tick = shape * noise[at]
        out[at] += amp(db) * tick / np.abs(tick).max()
    return out


def scrape(strokes, hoof_spectrum, per_s, spread_db, flutter_db, drag_db, shared_gain,
           hoof_peaks=(), modes=()):
    """Dense grains of friction sound in tool and hoof; each port is nearer to other teeth or bristles."""
    levels = np.zeros((3, N))
    for start, length, place, slope, db, hoof_db, teeth_db in strokes:
        at, shape = stroke(start, length, place, slope, BITE_DB_PER_S, LIFT_DB_PER_S)
        levels[:, at] += amp([[db], [db + teeth_db], [db + hoof_db]]) * shape
    levels += amp(drag_db) * uniform_filter1d(levels, int(0.29 * SR), axis=1)   # drag between strokes
    levels *= amp([2.0 * drift(23) for layer in range(3)])
    levels = uniform_filter1d(levels, size=180, axis=1)   # teeth engage within a few ms
    busy = slice(*np.flatnonzero(levels[0] > 1e-7)[[0, -1]])
    count = busy.stop - busy.start
    blade, teeth, hoof = levels[:, busy]
    flutter, shared = amp(flutter_db * drift(31)[busy]), grains(per_s, spread_db, count)
    # as the contact moves, each mode of the tool swells and fades by itself
    swells_db = [(level_curve(BLADE_RING_LEVEL) + 9.9 * np.tanh(1.9 * drift(9)))[busy] for mode in modes]
    out = np.zeros((2, N))
    for port in out:
        tear = grains(per_s, spread_db, count) * flutter
        ringing = sum(amp(db + swell) * ring(tear, hz, t60)
                      for (hz, db, t60), swell in zip(modes, swells_db))
        port[busy] += blade * band(tear + ringing, BLADE_SPECTRUM, HOUSING_PEAKS)
        port[busy] += teeth * band(tear + ringing, TEETH_SPECTRUM, HOUSING_PEAKS)
        port[busy] += hoof * band(tear + shared_gain * shared * flutter, hoof_spectrum, hoof_peaks)
    return out


def brush():
    """Bristles sweep the sole in fine grains."""
    return scrape(BRUSH_STROKES, BRUSHED_HOOF_SPECTRUM, per_s=9000, spread_db=2.8, flutter_db=2.0,
                  drag_db=-30.5, shared_gain=1.0)


def rasp():
    """Steel teeth tear the horn, ringing the blade and the hollow hoof."""
    return scrape(RASP_STROKES, RASPED_HOOF_SPECTRUM, per_s=5000, spread_db=2.96, flutter_db=1.05,
                  drag_db=-18, shared_gain=0.46, hoof_peaks=HOOF_PEAKS, modes=BLADE_MODES)


def groans_and_sings():
    """The hoof groans under a heavy stroke; the blade sings out as teeth catch."""
    return brief_tones(HOOF_GROANS, t60=0.053) + brief_tones(BLADE_SINGS, t60=0.014)


def wall_echo(x, t60=0.25, level_db=-12):
    """The yard walls send a short diffuse tail to each port."""
    t, reflected = np.arange(0, t60, 1 / SR), colour(x, WALL_SPECTRUM)
    tails = rng.standard_normal((2, len(t))) * amp(-60 * t / t60) * np.clip(t / 0.0025, 0, 1)
    echoes = [signal.oaconvolve(reflected, tail / np.linalg.norm(tail))[:N] for tail in tails]
    return amp(level_db) * np.array(echoes)


def scene():
    """The hoof work close by, with wall echo, cloth and low rumble, as it reaches the two ports."""
    tools = nippers() + pivot_squeak() + swishes()
    hands = bumps() + ticks() + brief_tones(CHIRPS, t60=0.014)
    brushing, rasping, tones = brush(), rasp(), groans_and_sings()
    near = tools + rasping
    near += moving(two_paths(hands, radians=0.49), wander_s=0.000401, rate_hz=3.0)
    near += moving([tones, tones], wander_s=0.000637, rate_hz=3.45)
    near += amp([[-1.5], [1.5]]) * brushing   # from the right
    echo = wall_echo(tools.mean(axis=0) + hands + brushing[0] + rasping[0] + tones)
    return near + echo + cloth() + rumble()


def record(dry, ceiling=.86, cutoff_hz=15700):
    """The microphone: each port has its own colour, the input rounds the peaks, the top is cut."""
    ports = [colour(x, [(hz, sign * db / 2) for hz, db in PORT_BALANCE]) for x, sign in zip(dry, (1, -1))]
    rounded = ceiling * np.tanh(np.array(ports) / ceiling)
    return signal.sosfilt(signal.cheby2(12, 70, cutoff_hz, fs=SR, output="sos"), rounded)


dry = scene()
out = record(dry)
put_to_file(out)
```